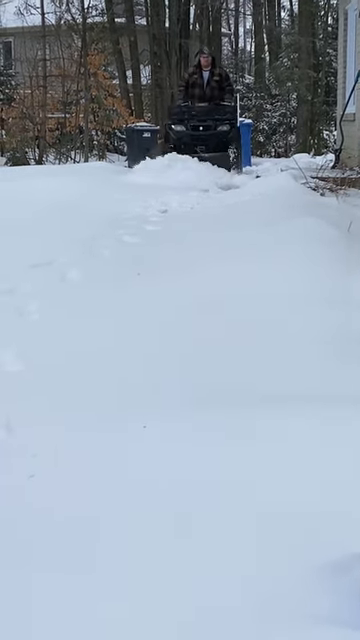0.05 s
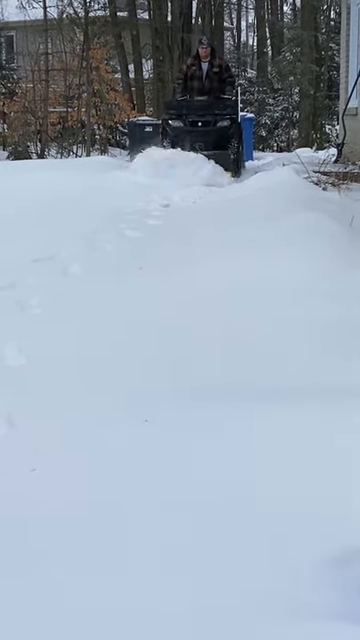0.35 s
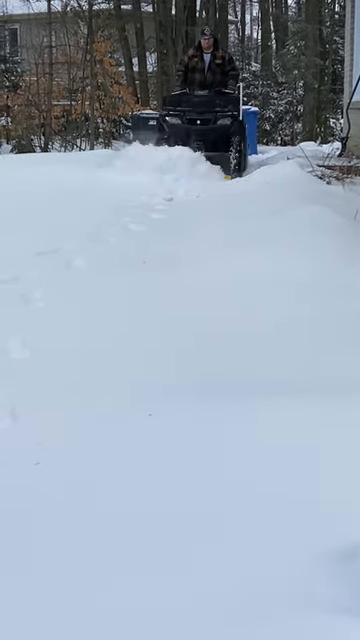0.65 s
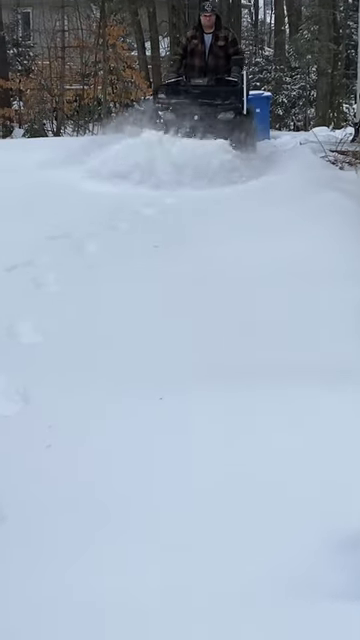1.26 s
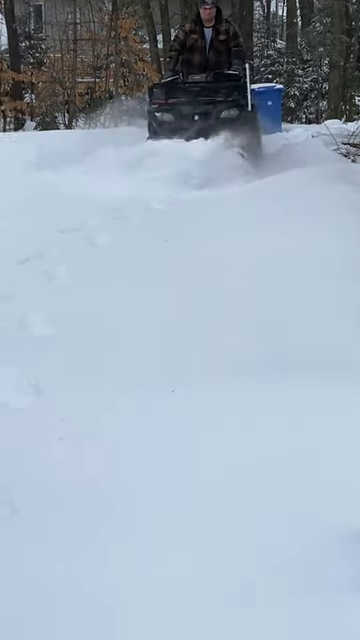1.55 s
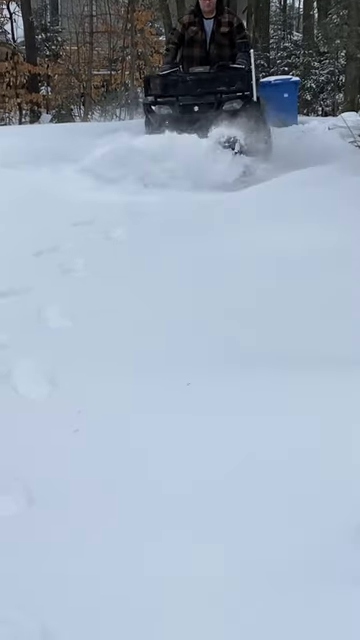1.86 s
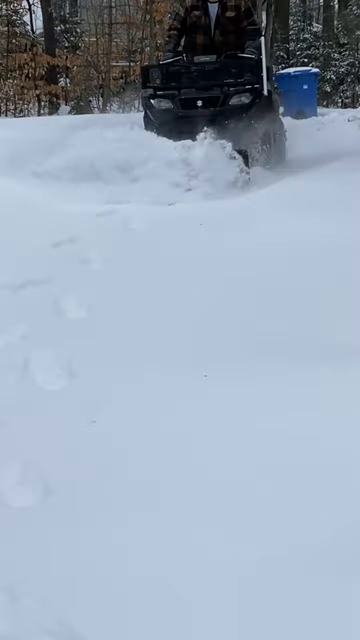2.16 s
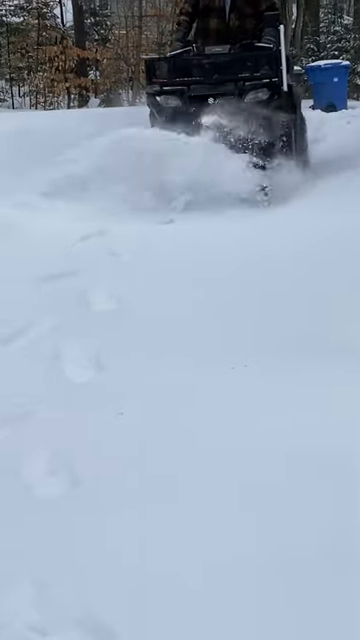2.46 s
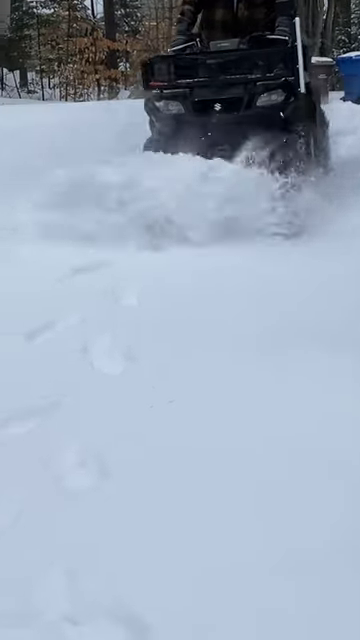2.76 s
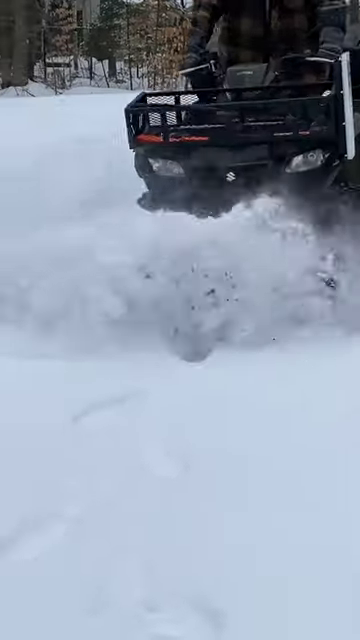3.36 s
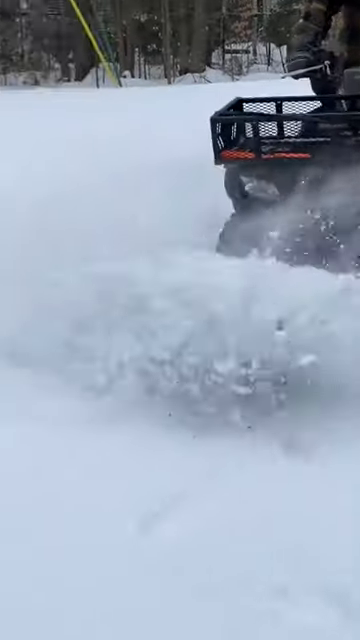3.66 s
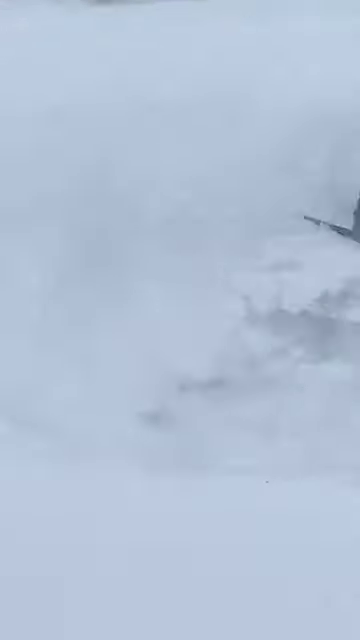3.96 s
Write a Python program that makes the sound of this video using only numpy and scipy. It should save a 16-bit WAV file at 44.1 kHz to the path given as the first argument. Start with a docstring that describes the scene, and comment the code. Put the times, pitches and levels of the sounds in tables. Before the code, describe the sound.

A quad bike engine chugs and clatters, approaching the microphone across a snowy yard. Its plough blade rattles and grinds over the ground amid rushing snow and low tyre rumble, and the labouring engine booms near the end.

```python
"""Quad bike ploughing snow

A single-cylinder quad bike pushes a plough blade through snow towards the listener in an open yard.
The exhaust thuds slower and nearer as the load grows, the pipe booms when the engine lugs, and the
engine clatters once a cycle. Over the rumble of the tyres the blade knocks, scrapes and squeals along
the ground, while powder rushes off it and packed slabs crumble."""
import sys
import numpy as np
from scipy import signal
from scipy.fft import rfft, irfft
from scipy.io import wavfile
from scipy.ndimage import map_coordinates

SR = 44100
rng = np.random.default_rng(int(sys.argv[2]) if len(sys.argv) > 2 else 0)


def inscribe(sig):
    """Save sig as 16-bit PCM at rate SR to the path in sys.argv[1].

    A 1-D sig is mono; a 2-D sig holds one channel per row.
    Samples are clipped to [-1, 1] before scaling.
    """
    pcm = np.round(np.clip(np.atleast_2d(sig).T, -1, 1) * 32767)
    wavfile.write(sys.argv[1], SR, pcm.astype(np.int16))


N = 176400
TIME = np.arange(N) / SR

# engine speed, sagging under the load (time [s], firing rate [Hz])
FIRING_RATE = [(0, 35.28), (.28, 36.06), (.47, 32.36), (.69, 31.18), (1.29, 29.86), (1.51, 29.95),
               (1.92, 30.94), (2.04, 29.76), (2.21, 26.53), (2.45, 27.64), (2.7, 28.09), (2.94, 26.7),
               (3.33, 25.35), (3.45, 22.2), (3.55, 23), (3.64, 19.5), (3.73, 24.6), (3.83, 23.2), (4, 23.1)]


def undb(db):
    """Decibels to gain."""
    return 10 ** (np.asarray(db) / 20)


def unit(x):
    """Scale to rms 1."""
    return x / np.sqrt(np.mean(x ** 2))


def curve(rows):
    """Join (time, value) rows by straight lines."""
    return np.interp(TIME, *np.array(rows, float).T)


def swells(rows):
    """Envelope of bell-shaped swells from (time [s], half length [s], level [dB]) rows."""
    return sum(undb(db) * np.exp(-((TIME - when) / length) ** 2) for when, length, db in rows)


def colour(x, points):
    """Minimum-phase EQ through (frequency [Hz], gain [dB]) points; output at rms 1."""
    size = 2 * N
    hz, db = np.array(points, float).T
    bin_hz = np.arange(N + 1) * SR / size
    gain = undb(np.interp(np.log(bin_hz + 1), np.log(hz), db))
    cepstrum = irfft(np.log(gain))
    cepstrum[1:N] *= 2  # folding the cepstrum makes the filter causal
    cepstrum[N + 1:] = 0
    response = np.exp(rfft(cepstrum))
    return unit(irfft(rfft(x, size) * response)[:N])


def walk(rate_hz):
    """Smooth random wander with a spread near 1."""
    steps = rng.standard_normal(4096)
    return map_coordinates(steps, [TIME * rate_hz], order=2, mode="wrap")


def grains(per_s, spread_db):
    """Dense random clicks of uneven size, at rms 1."""
    hit = rng.random(N) < per_s / SR
    size = undb(spread_db * np.minimum(rng.exponential(size=N), 5))
    return unit(hit * size * rng.choice([-1, 1], N))


def tyres():
    """A bed of low rumble from snow packing under the wheels."""
    # rumble EQ (frequency [Hz], gain [dB])
    tone = [(20, -16), (45, -3), (70, 2.5), (130, -6), (175, -2), (280, -15.5), (600, -37), (2000, -67)]
    # rumble, building on the approach (time [s], level [dB])
    level = [(0, -40), (.7, -37.5), (2.9, -37), (4, -28)]
    return colour(rng.standard_normal(N), tone) * undb(curve(level))


def spray():
    """Snow crystals pour off the blade in an uneven, hissing stream."""
    # bright powder EQ (frequency [Hz], gain [dB])
    tone = [(300, -27), (1000, -6.5), (2000, -1), (4000, 2.5), (5500, -1.5), (6500, 1), (8500, 5),
            (10500, 6.5), (13000, 5), (16000, 0)]
    # surges of thrown powder (time [s], level [dB])
    level = [(0, -59), (.55, -50.5), (1.1, -49), (1.25, -37.5), (1.55, -38), (1.66, -39.5), (1.93, -34),
             (2, -39), (2.12, -34), (2.35, -37.5), (2.79, -33), (2.93, -34.5), (3.2, -29.5), (3.38, -30.5),
             (3.7, -31), (3.87, -30), (4, -31.5)]
    flicker_db = 1.47
    flow = undb(flicker_db * (walk(rate_hz=20) + walk(rate_hz=130)))
    return colour(flow * grains(per_s=10000, spread_db=2.5), tone) * undb(curve(level))


def crunches():
    """Packed snow breaks in short showers of coarse grains."""
    # crunch EQ (frequency [Hz], gain [dB])
    tone = [(300, -4.5), (900, 1), (2700, 0), (5500, -4), (11000, -5.5), (16000, -8.5)]
    # slabs giving way (time [s], half length [s], level [dB])
    slabs = [(.555, .008, -35.5), (1.555, 0.041, -32.5), (1.95, 0.025, -32), (2.22, 0.014, -33),
             (2.77, .016, -27), (2.838, 0.011, -27.5), (3.15, 0.021, -29), (3.282, 0.019, -27.5),
             (3.85, .026, -24.5), (3.892, 0.015, -25.5)]
    return colour(grains(per_s=1500, spread_db=3.0), tone) * swells(slabs)


def scrape():
    """The blade edge grinds forward over the ground in small jerks."""
    # gritty scrape EQ (frequency [Hz], gain [dB])
    tone = [(100, -10.5), (250, -0.5), (430, 5.5), (650, -2.5), (870, -0.5), (1250, -7.5), (1900, -3.5),
            (2250, -7.5), (2550, -4.5), (3300, -8.5), (5500, -8), (8000, -11.5), (15000, -40)]
    # drag of the edge (time [s], level [dB])
    level = [(0, -42), (.55, -39.5), (1.05, -37), (1.25, -31.5), (1.38, -28.5), (1.7, -35.5), (1.94, -28.5),
             (2.02, -33), (2.22, -31), (2.35, -33.5), (2.48, -29.5), (2.95, -32.5), (3.13, -28),
             (3.35, -30), (3.6, -27.5), (3.85, -27.5), (4, -29)]
    roughness_db = 1.7
    jerks = undb(roughness_db * walk(rate_hz=85))
    return colour(jerks * grains(per_s=6000, spread_db=2.0), tone) * undb(curve(level))


def squeals():
    """The steel edge sings briefly as it drags: a narrow, unsteady ring."""
    # moments when the edge sings (time [s], half length [s], level [dB])
    drags = [(.85, .04, -43.5), (1.43, .08, -38.5)]
    pitch_hz, width_hz = 2490, 150
    phase = 2 * np.pi * pitch_hz * TIME
    ring = walk(2 * width_hz) * np.sin(phase) + walk(2 * width_hz) * np.cos(phase)
    return swells(drags) * unit(ring)


def knocks():
    """Bumps set the snow-damped blade rattling; its hollow ring depends on where it is struck."""
    # body of the blade (frequency [Hz], gain [dB])
    body = [(100, -19), (290, 4), (410, 9), (570, 2), (810, 3), (1200, -1.5), (1800, -2), (2700, -5),
            (5000, -16), (15000, -24)]
    # hits on the blade (time [s], level [dB], decay [s], ring [Hz])
    hits = [(.385, -24.5, 0.014, 850), (.402, -32, 0.017, 430), (0.616, -27, 0.023, 398),
            (.644, -28, 0.015, 695), (.738, -29, 0.017, 420), (0.754, -29, 0.017, 328),
            (0.785, -32.5, 0.033, 283), (1.208, -28, .02, 447), (2.207, -23.5, 0.02, 810),
            (2.261, -26, .01, 900), (2.481, -26.5, 0.021, 500), (3.078, -24.5, 0.024, 430),
            (3.144, -22, 0.027, 485), (3.59, -20.5, 0.0076, 480), (3.724, -22.5, 0.012, 400),
            (3.845, -25, 0.02, 735)]
    ring_db, ring_q, attack_s = -7.5, 1 / 0.23, 0.0012
    rattle = colour(grains(per_s=3800, spread_db=1.5), body)
    out = np.zeros(N)
    for start, db, decay_s, ring_hz in hits:
        age = np.maximum(TIME - start, 0)
        envelope = (1 - np.exp(-age / attack_s)) * np.exp(-age / decay_s)
        ring = unit(signal.lfilter(*signal.iirpeak(ring_hz, ring_q, fs=SR), rattle))
        out += undb(db) * envelope * unit(rattle + undb(ring_db) * ring)
    return out


def clatter(cycles):
    """Valve gear and drive chatter, swelling once a cycle and growing as the bike nears."""
    # EQ of the moving metal (frequency [Hz], gain [dB])
    tone = [(100, -22), (250, -1.5), (410, -1.5), (600, -4), (880, -2), (1200, -4), (1700, -3.5),
            (2100, -8.5), (2600, -7), (3400, -11), (5500, -27.5), (8000, -26), (15000, -28.5)]
    start_db, rise_db_per_s = -38.5, 0.5
    depth, peak_at_cycle = 0.14, 0.11
    pulse = np.exp(depth * np.cos(2 * np.pi * (cycles - peak_at_cycle)))
    chatter = colour(pulse * grains(per_s=6000, spread_db=2.0), tone)
    return chatter * undb(start_db + rise_db_per_s * TIME)


def boom(cycles):
    """When the engine lugs, each heavy firing rings the pipe."""
    # boom of the lugging engine (time [s], level [dB])
    level = [(0, -43), (.28, -57), (.43, -23.5), (.62, -43), (1.95, -57), (2.1, -31), (2.22, -25.5),
             (2.42, -47), (3.33, -49), (3.41, -15), (3.51, -13.5), (3.58, -21.5), (3.7, -23), (4, -25)]
    pipe_hz, attack_s, decay_s, strike_at_cycle = 100.2, 0.0034, 0.012, 0.45
    count = np.floor(cycles - strike_at_cycle)
    firings = np.diff(count, prepend=count[0])
    envelope = (1 - np.exp(-TIME / attack_s)) * np.exp(-TIME / decay_s)
    ring = np.sin(2 * np.pi * pipe_hz * TIME) * envelope
    booms = signal.fftconvolve(firings, ring)[:N]
    low_cut = signal.butter(2, 62, "high", fs=SR, output="sos")
    return unit(signal.sosfilt(low_cut, booms)) * undb(curve(level))


def exhaust(cycles):
    """A thud per firing, smeared by the pipe; its harmonics slide through the silencer's resonances."""
    # harmonics ahead of the silencer (multiple of the firing rate, level [dB])
    harmonics = [(2, 3), (3, 0), (4, -1.5), (5, -2.5), (6, -14), (7, -13.5), (8, -15.5), (9, -19),
                 (10, -15), (11, -19.5), (12, -17.5)]
    # silencer response (frequency [Hz], gain [dB])
    silencer = [(20, -10), (45, -11), (58, -3), (70, -1), (90, 1), (113, 5), (124, 4), (145, -4.5),
                (172, -2), (197, 0.5), (235, -10), (275, -3.5), (325, -6.5), (420, -1), (550, -0.5)]
    # fader on the deepest hum, at twice the firing rate (time [s], gain [dB])
    hum_fader = [(.25, 0.5), (.72, -10), (.85, 1), (1.15, -6), (1.3, 2.5), (1.45, -2), (1.58, -1.5),
                 (1.9, 0), (2.2, -3), (2.6, 3), (2.85, -3), (3.3, 4)]
    # fader on the whole exhaust (time [s], gain [dB])
    fader = [(0, -31.5), (.72, -31.5), (.9, -30), (1.6, -29), (1.92, -29), (2.2, -32), (2.45, -29),
             (2.7, -28), (2.95, -27), (3.33, -24.5), (3.43, -30), (3.65, -30), (3.76, -25), (4, -22.5)]
    thud_at_cycle, jitter_cycles, flutter_db, wander_hz = 0.755, 0.005, 0.8, 24.8
    smear_rad, sharpen_below_hz, sharpen_rad_per_hz = 1.15, 30.25, 0.48
    harden_below_hz, tilt_db_per_octave_per_hz = 29.3, 1.5
    firing_hz = curve(FIRING_RATE)
    crank = cycles - thud_at_cycle + jitter_cycles * walk(wander_hz)
    # as the engine slows, the upper harmonics close up into a distinct thud and grow stronger
    sharpen_rad = sharpen_rad_per_hz * np.clip(sharpen_below_hz - firing_hz, 0, 4.5)
    tilt_db_per_octave = tilt_db_per_octave_per_hz * np.maximum(harden_below_hz - firing_hz, 0)
    silencer_hz, silencer_db = np.array(silencer).T
    thuds = np.zeros(N)
    for order, db in harmonics:
        order = round(order)
        load_db = tilt_db_per_octave * min(np.log2(order / 4), 1)
        resonance_db = np.interp(np.log(order * firing_hz), np.log(silencer_hz), silencer_db)
        gain = undb(db + load_db + resonance_db)
        if order == 2:
            gain *= undb(curve(hum_fader))
        lag = smear_rad * order ** 2 + sharpen_rad * np.clip(order - 4, 0, 2)
        thuds += gain * np.sin(2 * np.pi * order * crank - lag)
    return np.sqrt(2) * thuds * undb(curve(fader) + flutter_db * walk(wander_hz))


def scene():
    """The bike straight ahead, with a little of the ploughing noise in the side channel."""
    cycles = np.cumsum(curve(FIRING_RATE)) / SR
    engine = exhaust(cycles) + boom(cycles) + clatter(cycles)
    mid = engine + tyres() + scrape() + squeals() + spray() + crunches() + knocks()
    # uncorrelated scrape, clatter, hiss and rumble widen the stereo image a little
    high_cut = signal.butter(2, 2400, fs=SR, output="sos")
    dull_grit = signal.sosfilt(high_cut, scrape() + clatter(cycles))
    side = undb(-17) * dull_grit + undb(-19) * spray() + undb(-34) * tyres()
    return np.array([mid + side, mid - side])


def record(dry):
    """A stereo microphone whose two ports differ in phase and level, with a steep cut at the top."""
    # phase between the ports (frequency [Hz], lead of left over right [rad])
    port_phase = [(20, 0), (280, 0), (620, -.9), (1000, -.85), (1150, .5), (1450, 0), (5050, .15),
                  (6900, 3.1), (8150, 3.3), (8550, 4.3), (9750, 6.2), (11450, 6.35), (11900, 7.8),
                  (12900, 9.3), (14400, 9.6), (15700, 12.3)]
    # balance between the ports (frequency [Hz], left minus right [dB])
    port_balance = [(20, -1), (200, 0.5), (380, 0.5), (700, -4), (1290, -3.5), (2000, -1), (2400, 0),
                    (15000, 0)]
    top_hz = 15900
    hz = np.arange(N + 1) * SR / (2 * N)
    lead = np.interp(hz, *np.array(port_phase).T)
    balance_db = np.interp(hz, *np.array(port_balance).T)
    left = undb(balance_db / 2) * np.exp(0.5j * lead)
    right = 1 / left
    heard = irfft(rfft(dry, 2 * N) * np.array([left, right]))[:, :N]
    high_cut = signal.ellip(10, 0.2, 80, top_hz, fs=SR, output="sos")
    return signal.sosfilt(high_cut, heard)


dry = scene()
out = record(dry)
inscribe(out)
```